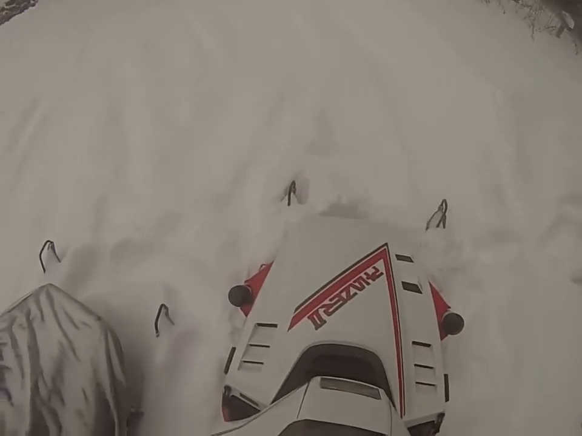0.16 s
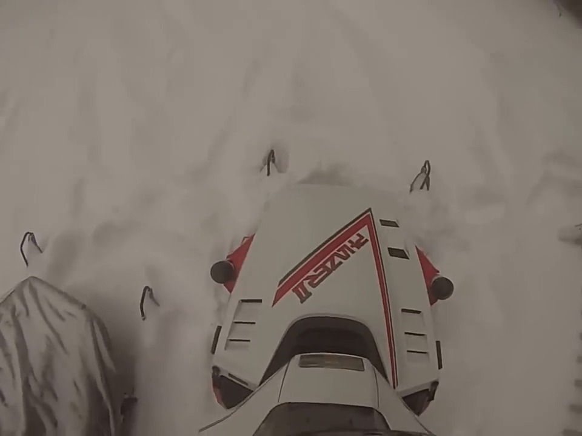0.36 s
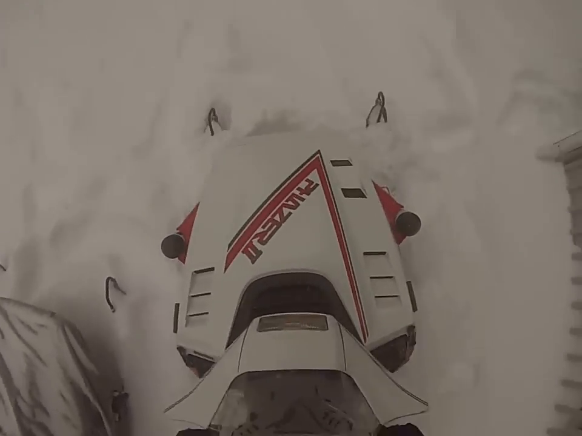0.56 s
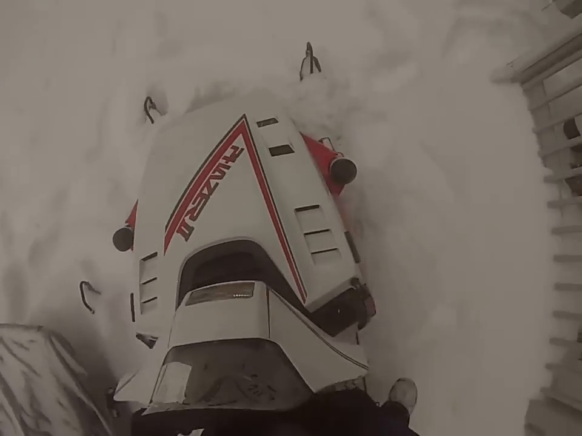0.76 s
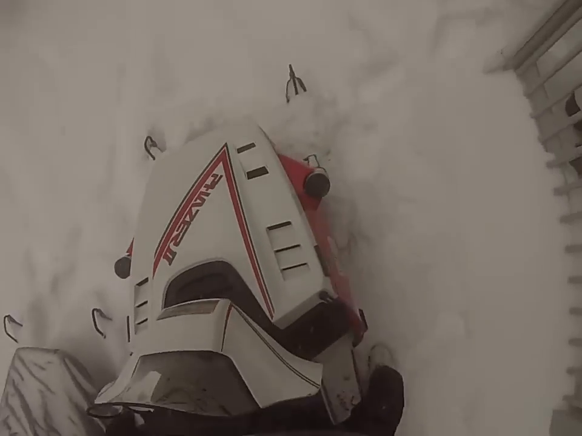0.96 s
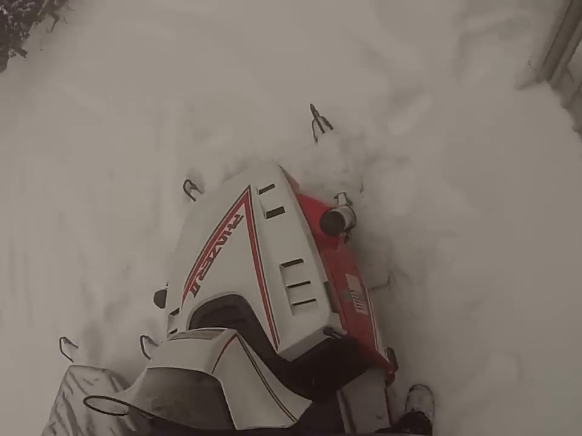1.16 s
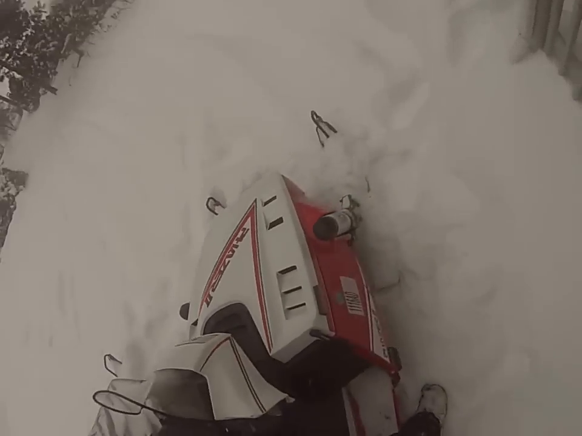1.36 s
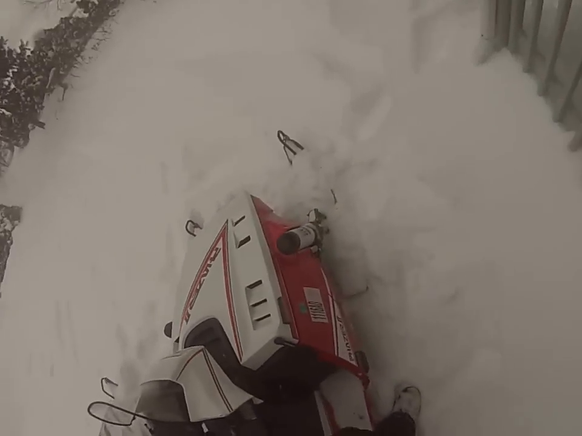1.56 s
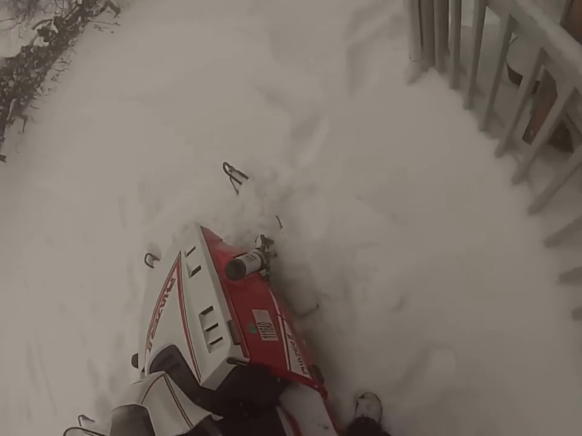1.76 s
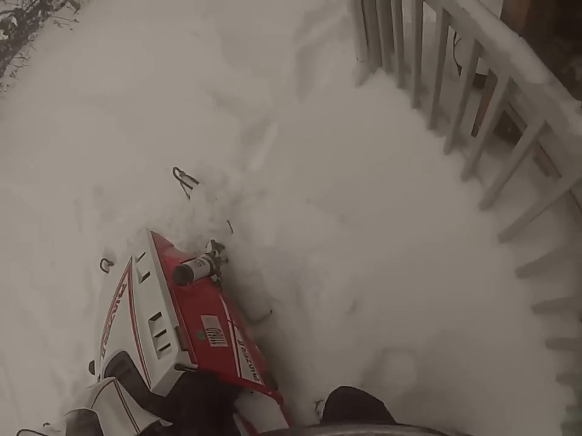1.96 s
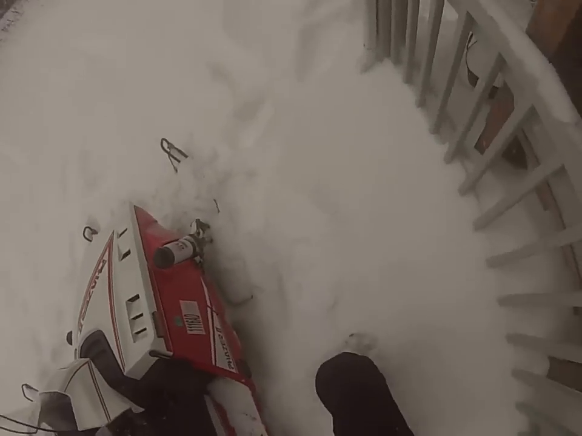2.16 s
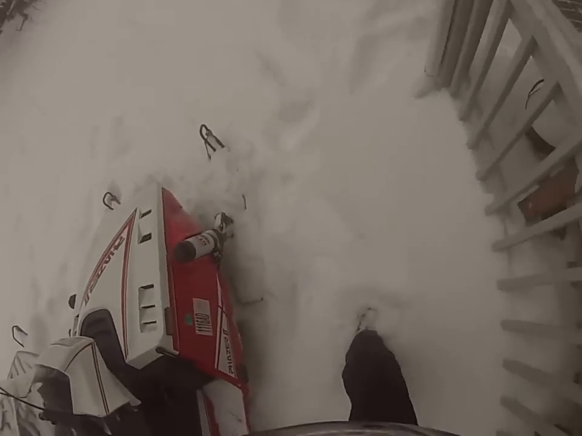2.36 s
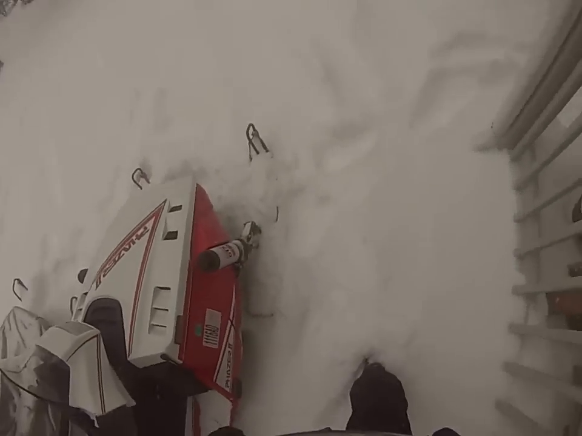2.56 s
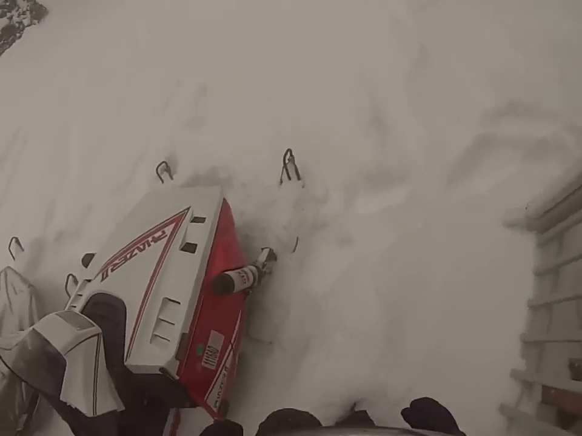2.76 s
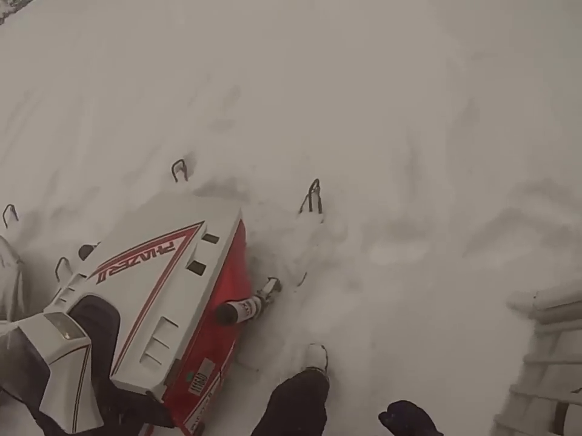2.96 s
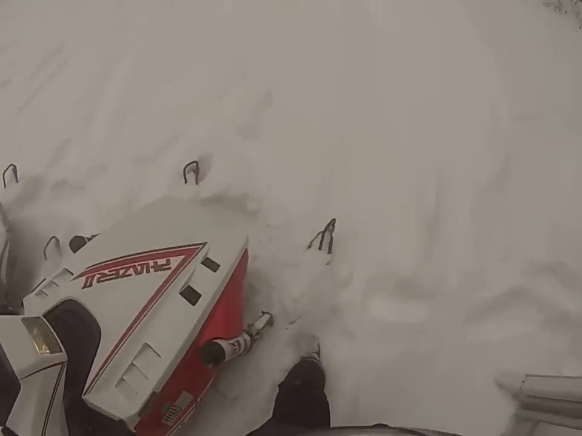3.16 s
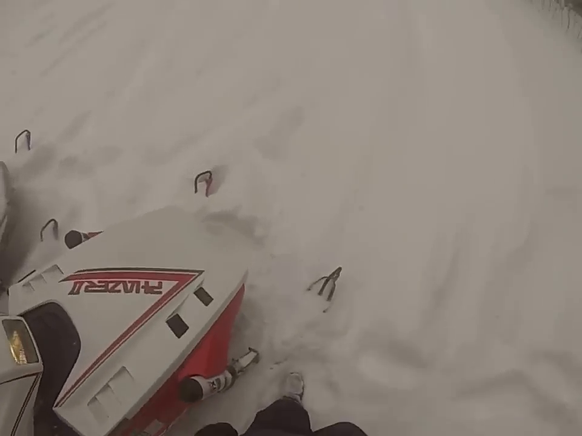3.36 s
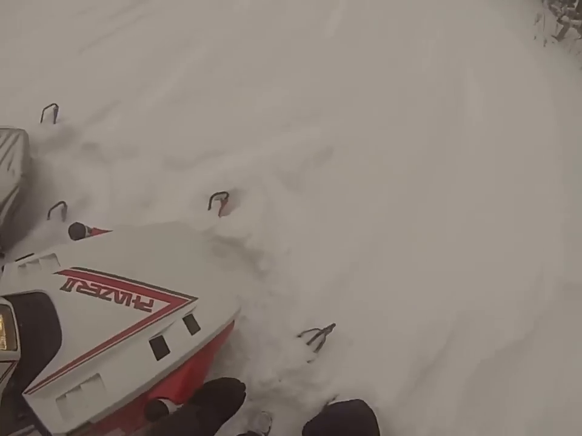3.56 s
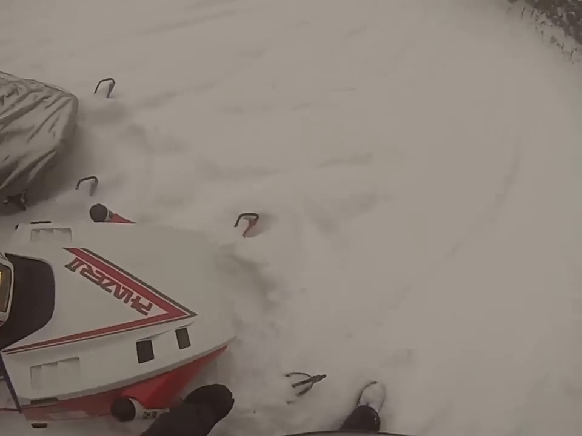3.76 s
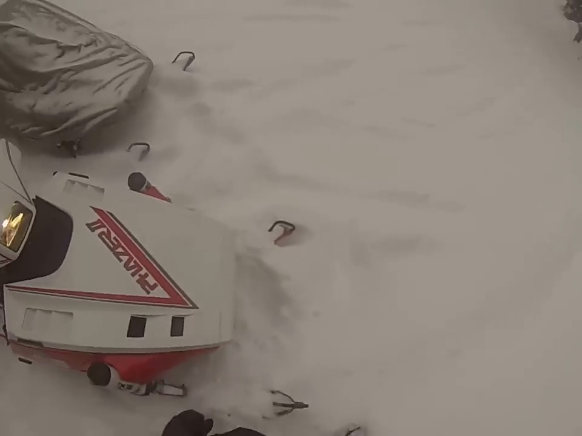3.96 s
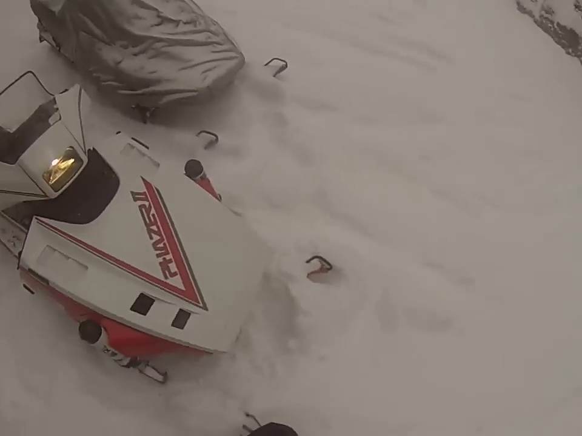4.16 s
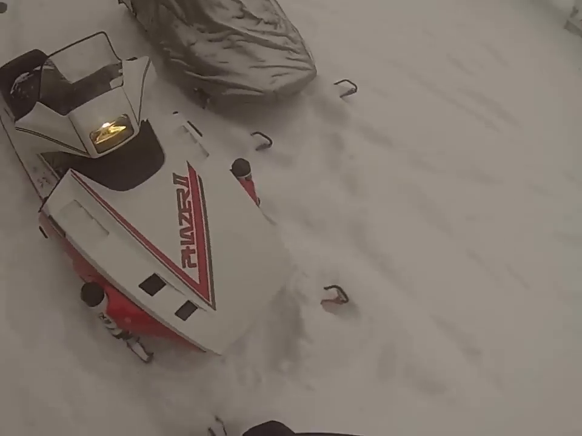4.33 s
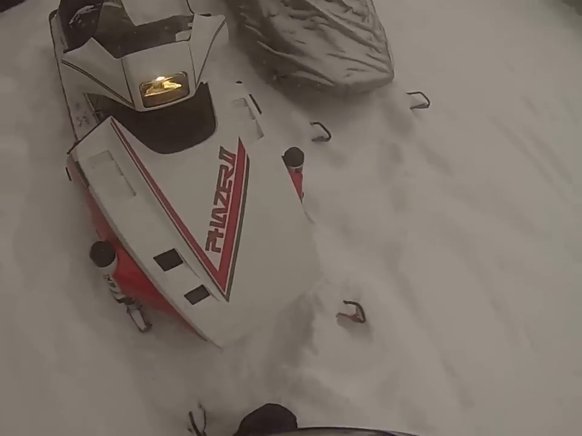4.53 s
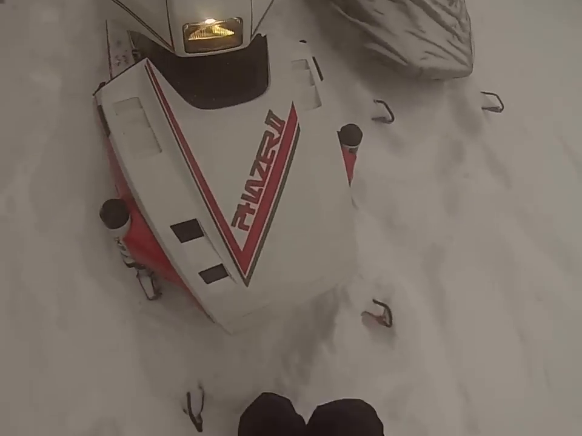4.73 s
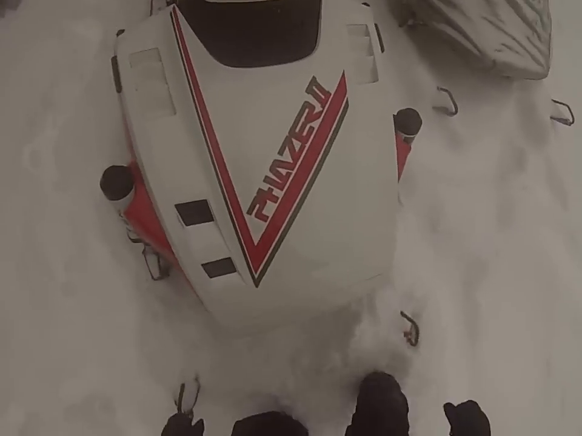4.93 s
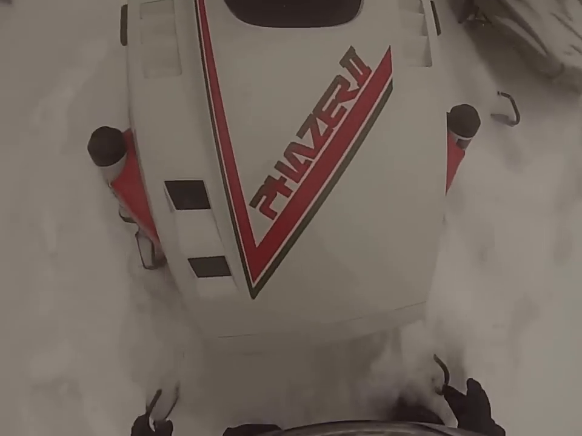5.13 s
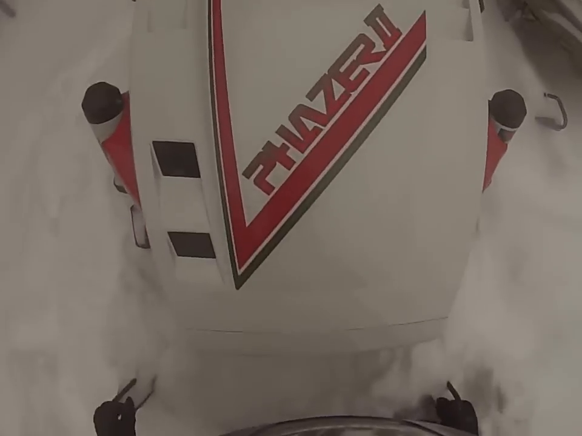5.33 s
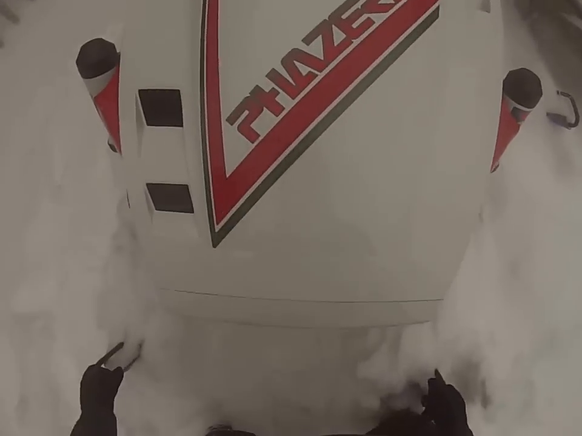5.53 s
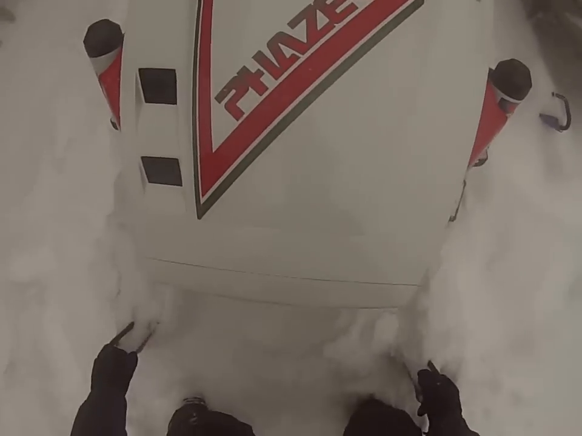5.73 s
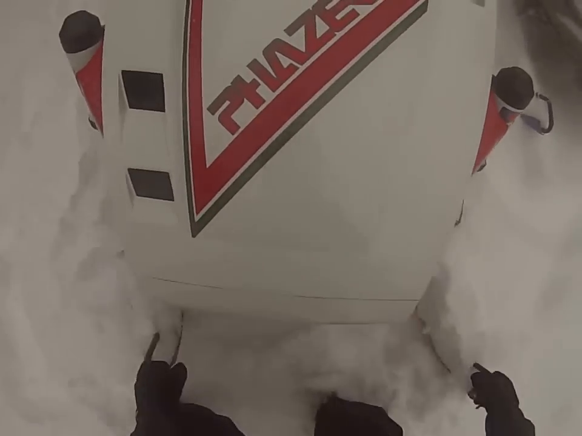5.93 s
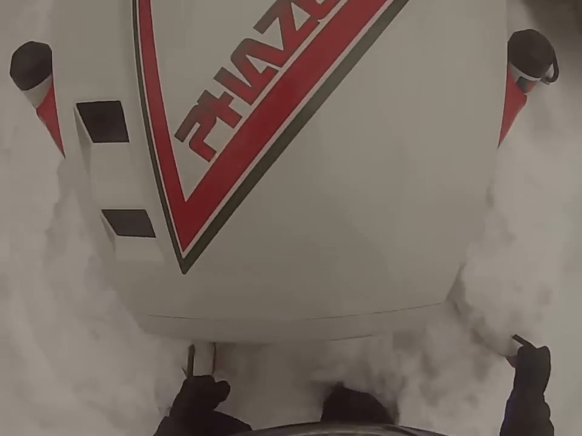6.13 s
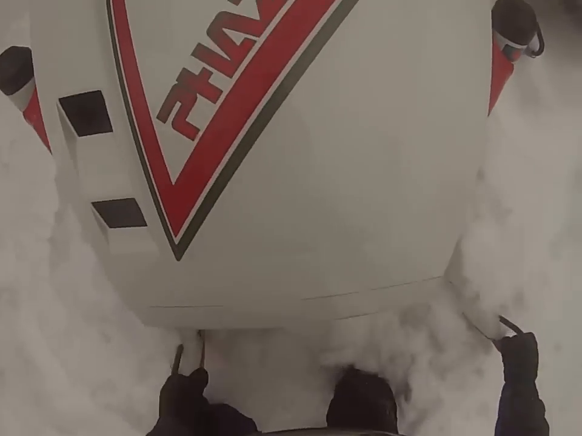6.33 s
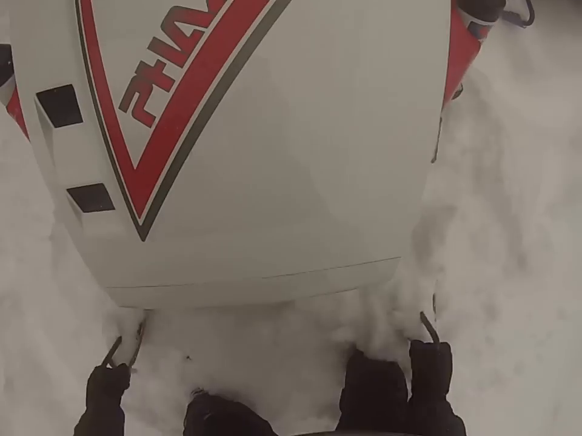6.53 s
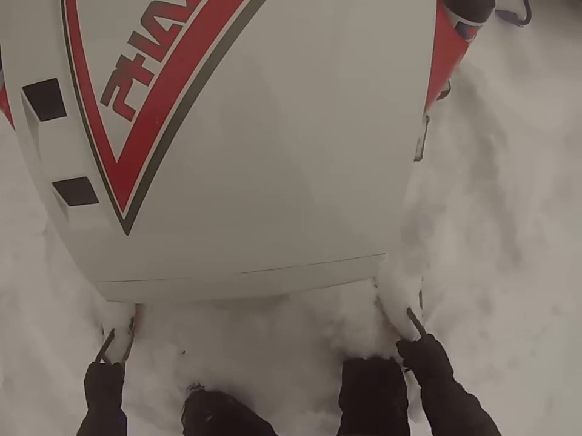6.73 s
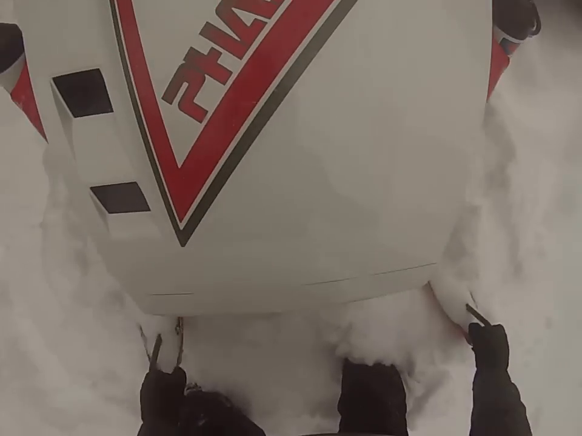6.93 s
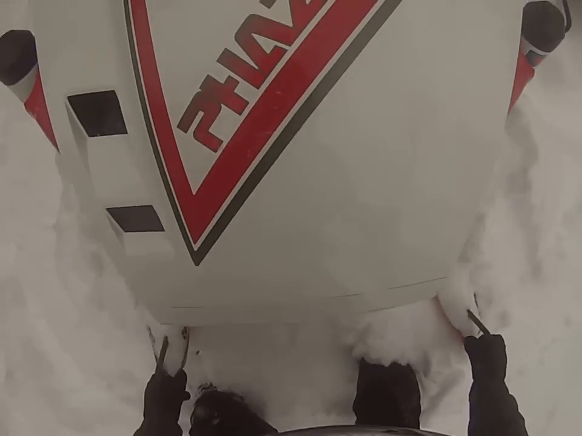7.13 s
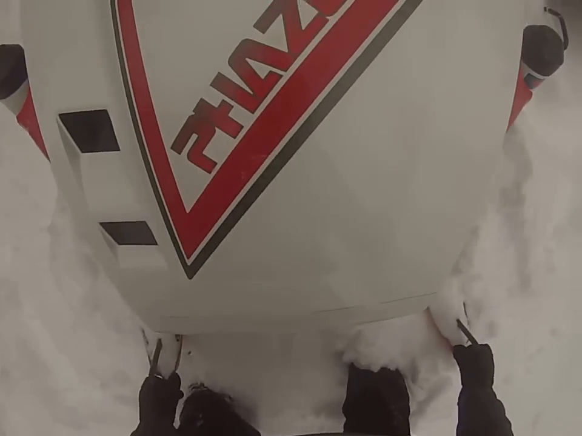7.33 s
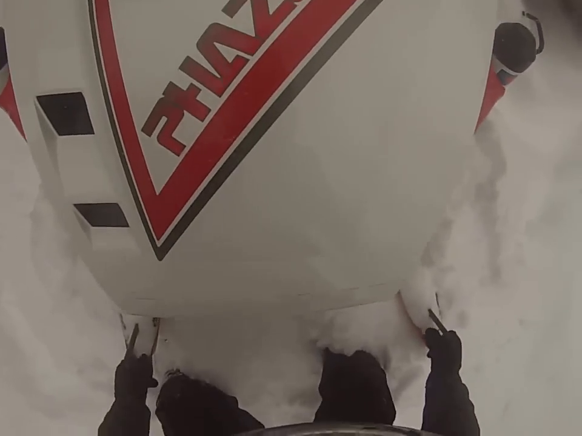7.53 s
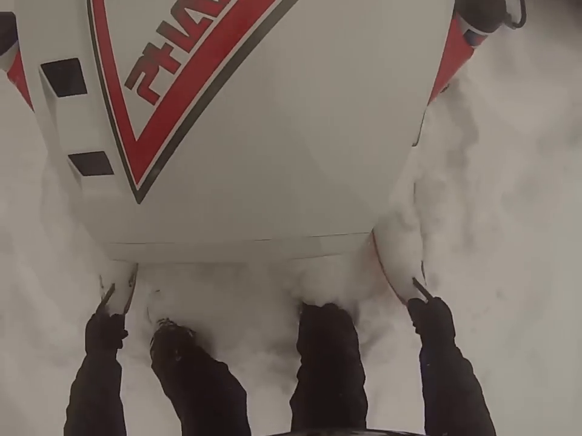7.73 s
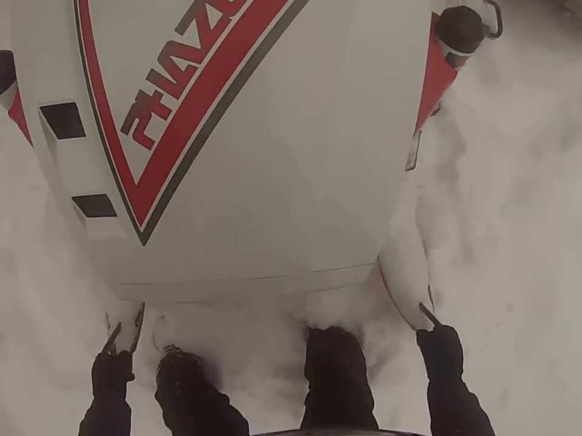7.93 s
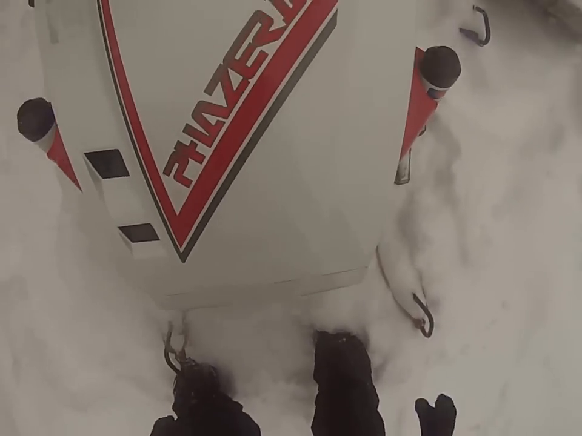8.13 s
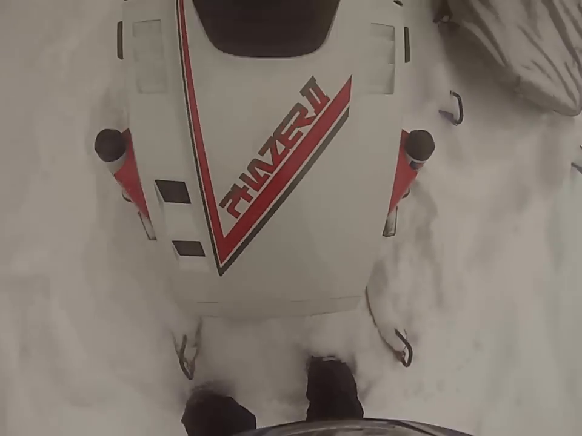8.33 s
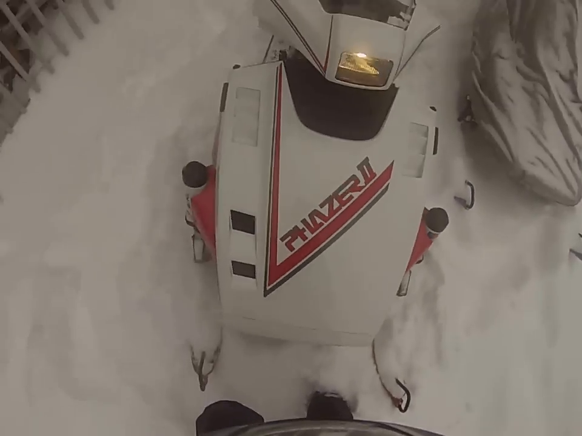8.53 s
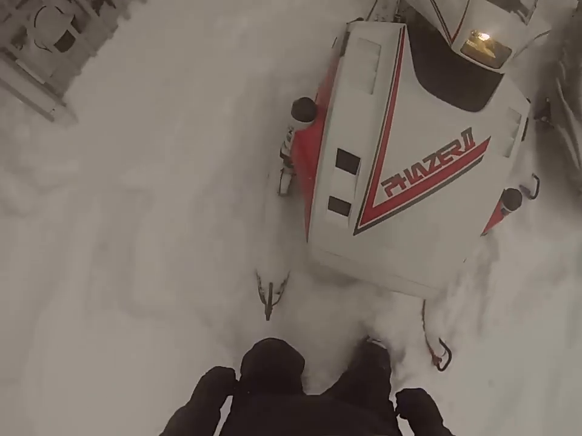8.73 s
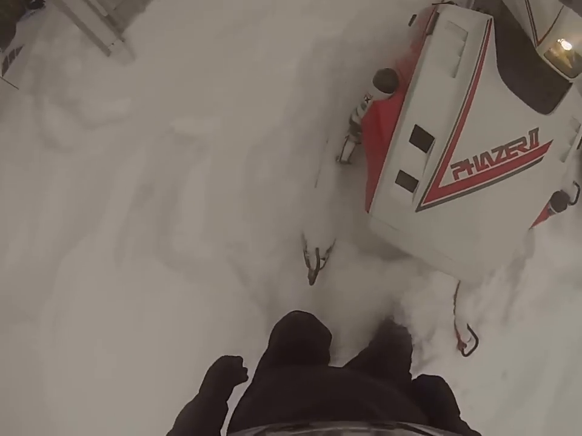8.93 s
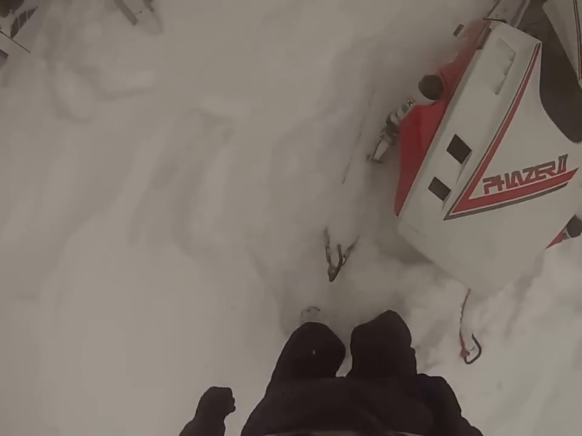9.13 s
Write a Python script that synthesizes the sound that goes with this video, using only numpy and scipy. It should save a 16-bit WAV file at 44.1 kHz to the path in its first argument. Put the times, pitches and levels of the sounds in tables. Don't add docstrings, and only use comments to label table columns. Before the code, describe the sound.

A two-stroke snowmobile engine idles throughout, heard outdoors in snow from a moving helmet microphone. A low hum near a hundred hertz throbs with a quick, uneven limp over rough exhaust burble, while the cowl clatters and hisses. From 0 to 3.4 seconds, crisp snow and cloth snaps, fine crackle and dull housing taps are frequent; the fan whine swells near 1 second and again at 2.5. From about 2 to 5 seconds an airy intake rush is present, and the engine seems a little farther off. At 5.2 the whine peaks as the sound grows close and bright. From 5.7 to 7.2 hard piston knocks cluster, ringing the panels, and the idle sags slightly. Scattered knocks continue to 8.3, with buzzing panels and a few snaps, before the clatter eases toward 9.3. Very low wind bumps and momentary treble thinning occur along the way.

```python
import sys
import numpy as np
from scipy import signal
from scipy.fft import rfft, irfft, next_fast_len
from scipy.io import wavfile
from scipy.ndimage import uniform_filter1d, map_coordinates

SR = 44100
rng = np.random.default_rng(int(sys.argv[2]) if len(sys.argv) > 2 else 0)


def store_wav(level_fs):
    pcm = np.round(np.clip(np.atleast_2d(level_fs), -1, 1) * 32767)
    wavfile.write(sys.argv[1], SR, pcm.T.astype(np.int16))


def boost_factor(decibels):
    exponent = np.asarray(decibels, float) / 20
    return 10 ** exponent


N = 409675


def rms_one(x):
    return x / np.sqrt(np.mean(x ** 2) + 1e-20)


def in_time(rows):
    s, *columns = np.transpose(rows)
    return [np.interp(np.arange(N) / SR, s, c) for c in columns]


def drift(rate):
    r = np.exp(-80 * np.pi * rate / SR)
    slow = signal.lfilter([1], [1, -2 * r, r * r], rng.standard_normal(N // 40 + 2002))[2000:]
    return np.interp(np.arange(N) / 40, np.arange(len(slow)), rms_one(slow))


def swells(rows):
    t = np.arange(0, N + 100, 100) / SR
    lift = np.max([db * np.exp(-2 * ((t - s) / length) ** 2) for s, length, db in rows], axis=0)
    return np.interp(np.arange(N) / SR, t, lift)


def coloured(x, spectrum):
    size = next_fast_len(N)
    hz, db = np.transpose(spectrum)
    bins = np.arange(size // 2 + 1) * SR / size
    gain = boost_factor(np.interp(np.log(bins + 1), np.log(hz), db, left=-90, right=-90))
    return rms_one(irfft(rfft(x, size) * gain, size)[:N])


def resonance(x, hz, width):
    r = np.exp(-np.pi * width / SR)
    return signal.lfilter([(1 - r * r) / 2, 0, (r * r - 1) / 2], [1, -2 * r * np.cos(2 * np.pi * hz / SR), r * r], x)


def ringing(x, hz, width):
    return rms_one(resonance(resonance(x, hz, width), hz, width))


def between(nose, side_sound, nose_sound):
    return (1 - nose) * side_sound + nose * nose_sound


# frequency in Hz, level in dB per Hz.
AIR_COLOUR = [(200, -17), (5000, -10), (9000, -10), (13000, -4), (15500, -28), (16500, -30)]


def still_air():
    return boost_factor(-65) * coloured(rng.standard_normal(N), AIR_COLOUR)


# centre in seconds, length in seconds, rise over the lull in dB.
GUSTS = [(.45, .3, 3), (1.15, .3, 11), (1.6, 0.32, 15), (2.1, 0.27, 22), (2.5, .15, 16), (3.2, 0.12, 17),
         (4.15, .3, 3), (4.55, 0.14, 11), (5.6, .25, 13), (6.03, 0.1, 14), (6.5, .15, 15), (6.85, 0.2, 10),
         (7.95, 0.48, 14)]


def buffet():
    slow_lumps = ringing(rng.standard_normal(N), 7.6, 20.0)
    quick_lumps = ringing(rng.standard_normal(N), 22, 28.3)
    lull_db = -52
    return boost_factor(lull_db + swells(GUSTS)) * rms_one(slow_lumps + .12 * quick_lumps)


def crackle(stir):
    grains_per_s = 420 * stir * boost_factor(3.0 * drift(11))
    sizes = boost_factor(2.1 * np.minimum(rng.exponential(1, N), 4))
    grains = (rng.random(N) < grains_per_s / SR) * sizes
    tails = signal.lfilter([1], [1, -.97], grains) * rng.standard_normal(N)
    band = signal.butter(1, [6000, 14000], "band", fs=SR, output="sos")
    return boost_factor(-58.5) * 2.36 * signal.sosfilt(band, tails)


# start in seconds, peak in dB.
SNAPS = [(0.0348, -37), (0.0772, -33), (0.1206, -31), (0.161, -28.5), (0.2379, -36), (0.3835, -44),
         (0.4032, -29), (0.4264, -34), (0.632, -37), (0.6444, -36), (0.7023, -33), (0.7991, -38),
         (0.8101, -36), (0.836, -29), (0.843, -33), (0.8739, -32), (1.0311, -35), (1.1, -39), (1.1313, -37),
         (1.1434, -34), (1.259, -38), (1.448, -35), (1.5075, -43), (1.5349, -35), (1.6057, -43),
         (1.62, -36), (1.8392, -37.5), (1.9849, -44), (2.0457, -41), (2.0916, -34), (2.1016, -34),
         (2.1221, -39), (2.173, -32.5), (2.3176, -37), (2.327, -39), (2.3411, -38), (2.3544, -37),
         (2.4099, -45), (2.4773, -43), (2.6599, -46), (2.7038, -38), (2.7516, -35), (2.794, -41),
         (2.9392, -36), (3.1487, -40), (3.161, -35), (3.316, -34), (3.3358, -37), (3.9539, -38),
         (4.148, -40), (5.4555, -34), (6.3126, -36), (7.2669, -34), (7.4689, -34), (7.4774, -32),
         (7.8506, -39), (8.2282, -35), (8.4881, -43), (8.6522, -41)]
# start in seconds, peak in dB.
TAPS = [(0.0972, -34), (0.403, -30), (0.5086, -29), (0.7991, -30), (0.8744, -38), (0.8914, -30),
        (1.4292, -34), (1.5449, -32), (2.0562, -39), (2.102, -31), (2.1755, -34), (2.2518, -35),
        (2.3184, -30), (2.3264, -34), (2.3404, -26), (2.661, -34), (3.2525, -34), (3.365, -27),
        (4.6548, -31), (5.3802, -37), (5.4335, -29), (5.8192, -41), (7.1716, -29), (7.2674, -38),
        (7.8012, -38), (8.6532, -34)]


def ticks(stir):
    snaps, rings, t = np.zeros(N + 400), np.zeros(N + 400), np.arange(400) / SR
    chance = np.cumsum(stir ** 2) / np.sum(stir ** 2)
    when = np.interp(rng.random(12), chance, np.arange(N) / SR)
    small = np.c_[when, -47 + 2 * rng.standard_normal((12, 2))]
    # (s, snap dB, ring dB)
    rows = [(s, db, db - 7) for s, db in SNAPS] + [(s, db - 16, db) for s, db in TAPS] + list(small)
    for (s, snap_db, ring_db), burst in zip(rows, rng.standard_normal((len(rows), 400))):
        start = round(s * SR)
        snap = burst * (np.exp(-t / 0.0006) + .2 * np.exp(-t / .003)) * (t > .0005)
        snaps[start:][:400] += boost_factor(snap_db + 8.0) * snap / np.abs(snap).max()
        ring_hz = 5150 * (1 + .04 * burst[-1])
        ring = np.sin(2 * np.pi * ring_hz * t) * 3 * np.exp(-t / 0.00059) * np.clip(t / 0.0012, 0, 1)
        rings[start:][:400] += boost_factor(ring_db + 2.5) * ring
    band = signal.butter(1, [5500, 16000], "band", fs=SR, output="sos")
    return (signal.sosfilt(band, snaps + 1e-18) + rings)[:N]


# time in seconds, pitch in Hz.
FAN_PITCH = [(0, 2100), (.5, 2078), (.85, 2065), (1.3, 2072), (2.2, 2085), (2.5, 2068), (3.1, 2088),
             (3.6, 2060), (4.6, 2090), (5.25, 2072), (5.9, 2068), (6.3, 2040), (7.15, 2015), (7.6, 2040),
             (8.5, 2025), (9.29, 2060)]
# time in seconds, level in dB.
FAN_LEVEL = [(0, -52), (.6, -41.5), (1.0, -37.5), (1.3, -47), (1.7, -46.5), (2.25, -50), (2.5, -39),
             (2.8, -60), (3.2, -48), (4.2, -55), (4.7, -44), (5.1, -35.5), (5.25, -30.5), (5.45, -37),
             (5.7, -38), (6.2, -50), (7.05, -41), (7.3, -43), (7.6, -41), (8.0, -54), (8.6, -43.5),
             (9.29, -49)]


def fan():
    (whine_hz,), (db,) = in_time(FAN_PITCH), in_time(FAN_LEVEL)
    wobble = 1.1 * drift(19) + drift(1.0)
    skirt = 1 + .15 * (drift(35) + 1j * drift(27))
    whine = np.exp(1j * (2 * np.pi * np.cumsum(whine_hz) / SR + wobble))
    return boost_factor(db + 1.3 * drift(5)) * np.real(skirt * whine)


# start in seconds, peak in dB.
KNOCKS = [(.238, -35), (.313, -24), (1.132, -26), (1.43, -29), (2.043, -29), (2.174, -21.5), (2.361, -26),
          (3.754, -28), (3.973, -20.5), (5.026, -19), (5.176, -22), (5.759, -17), (5.876, -25),
          (5.9135, -16), (5.994, -14), (6.055, -17), (6.1925, -12), (6.2566, -17), (6.3734, -17),
          (6.383, -13), (6.4348, -19), (6.458, -16), (6.478, -18), (6.6378, -14), (6.718, -11.5),
          (6.837, -18), (6.955, -18), (7.1182, -14), (7.1795, -18), (7.277, -32), (7.3701, -28),
          (7.4424, -20), (7.476, -19), (7.53, -25), (7.7323, -30), (8.0226, -24), (8.1, -23), (8.2281, -21),
          (8.2891, -16)]


def knocks():
    blows, k = np.zeros(N), np.arange(900)
    rattle_s = .009
    for (s, db), burst in zip(KNOCKS, rng.standard_normal((len(KNOCKS), 900))):
        thud = np.sin(k * 0.24) * np.exp(-k / 12) * 1.04
        rattle = .2 * burst * np.exp(-k / (rattle_s * SR))
        blows[round(s * SR):][:900] += boost_factor(db + 11) * (thud + rattle)
    return resonance(blows + 1e-18, 1590, 74) + 0.71 * resonance(blows + 1e-18, 2150, 160)


def strokes(firings, depth_db, scatter_db):
    count = firings.astype(int)
    strength = uniform_filter1d(rng.standard_normal(count[-1] + 1)[count], size=120)
    return rng.standard_normal(N) * boost_factor(depth_db * np.cos(np.pi * firings) + scatter_db * strength)


def intake(rush):
    start, end, turn_s = 2.0, 5.1, 0.47
    hidden_db, open_db = -58.5, -55
    db, = in_time([(start - turn_s, hidden_db), (start, open_db), (end, open_db), (end + turn_s, hidden_db)])
    return boost_factor(db) * ringing(rush[::-1], 6850, 990)


# frequency in Hz, level in dB per Hz.
COWL_SIDE = [(760, -26), (1300, -14), (1430, -11), (1630, 0.5), (1860, -10), (2130, -8.5), (2380, -15.5),
             (2610, -11), (3270, -13.5), (3520, -14.5), (3900, -32), (4200, -48), (5460, -75.5),
             (9240, -120)]
COWL_NOSE = [(760, -24), (1300, -10), (1360, -46), (1410, -10.5), (1650, -4.5), (1860, -3.5), (2090, -2.5),
             (2450, -9), (2570, -8), (2850, -14), (3490, -8), (4200, -20.5), (5460, -62.5), (9240, -120)]
# frequency in Hz, level in dB per Hz.
HISS_SIDE = [(3600, 6), (4000, -3), (4500, 2.5), (5000, 3), (5300, 5.5), (5900, 0.5), (7300, -8.5),
             (8300, -9.5), (10000, -9), (12000, -31), (15400, -45), (16000, -40)]
HISS_NOSE = [(3600, -18), (4000, -5.5), (4500, 3.5), (5000, 4.5), (5300, 2), (5900, 7.5), (7300, -1.5),
             (8500, -6), (10200, -4.5), (11500, -10.5), (15400, -16), (16000, -40)]
# frequency in Hz, width in Hz, level in dB.
PANELS = [(1057, 84, -16), (1474, 163, -9.5), (2230, 180, -12.5), (2388, 58, -11.5), (3112, 73, -17.5),
          (3436, 190, -14.5), (4760, 110, -22), (5330, 360, -11.5)]
# frequency in Hz, width in Hz, level in dB.
BRACKETS = [(3460, 80, -10), (4800, 120, -18), (5300, 150, -17), (1640, 50, -10)]
# centre in seconds, length in seconds, rise over its rest in dB.
BUZZES = [(1.45, 0.14, 6), (2.35, 0.12, 16), (2.75, 0.34, 16), (3.3, 0.071, 9), (5.9, 0.23, 4),
          (6.28, .12, 3), (6.5, .2, 11), (7.1, 0.66, 7.5), (7.45, 0.29, 9), (8.15, 0.22, 16)]


def body(firings, nose, cowl_db, echo_ms):
    knock = strokes(firings, depth_db=1.0, scatter_db=1.0)
    rush = strokes(firings, depth_db=.6, scatter_db=1.74)
    cowl = between(nose, coloured(knock, COWL_SIDE), coloured(knock, COWL_NOSE))
    panels = sum(boost_factor(db + 2.0 * drift(0.89)) * ringing(knock, hz, width) for hz, width, db in PANELS)
    clatter = boost_factor(-41.5 + cowl_db) * (cowl + boost_factor(-6.5) * panels)

    big_panel_db = -59 + 0.85 * cowl_db + swells(BUZZES) + 4 * drift(7.1) + 1.5 * drift(5.5)
    big_panel = boost_factor(big_panel_db) * between(nose, ringing(knock, 1605, 110), ringing(knock, 1668, 199.8))

    hiss = between(nose, coloured(rush, HISS_SIDE), coloured(rush, HISS_NOSE))
    hiss = hiss + .25 * map_coordinates(hiss, [np.arange(N) - echo_ms * SR / 1000], order=3)
    brackets = sum(boost_factor(db + 2.5 * drift(2.5)) * ringing(rush, hz, width) for hz, width, db in BRACKETS)
    hiss_db = -49.5 + 0.63 * cowl_db
    return clatter + big_panel + boost_factor(hiss_db) * (hiss + brackets) + intake(rush)


# eighths of the firing rate, level in dB from the side, dB from the nose.
LIMP_LINES = [(2, -32, -46), (3, -40, -36), (4, -18, -24), (5, -25, -18), (7, -16.5, -23), (9, -15, -31),
              (10, -20, -32), (11, -31, -21), (12, -30, -19), (13, -24, -16.5), (14, -34, -32),
              (16, -19, -28), (18, -32, -38), (19, -23, -28), (20, -24, -29), (21, -27, -30),
              (24, -27, -27), (27, -42, -36), (28, -38, -24), (29, -42, -34), (32, -24, -34),
              (36, -32, -28), (37, -35, -30), (40, -36, -28)]
# frequency in Hz, level in dB per Hz.
BURBLE_SIDE = [(24, -50), (40, -29), (78, -4.5), (102, -3), (128, -8), (153, -13), (253, -14), (321, -26.5),
               (420, -21), (738, -27), (1400, -27), (1820, -67), (3080, -120)]
BURBLE_NOSE = [(24, -55), (40, -31), (76, -8), (102, -7.5), (122, -14), (146, -10.5), (212, -22),
               (540, -17), (728, -21.5), (883, -18.5), (1400, -27.5), (1820, -72), (3080, -120)]


def exhaust(firings, limp, nose, cowl_db, outlet_db):
    throb_db = np.clip(2.1 - 1.3 * nose, 1.2, 2.4) * np.cos(limp)
    hum_db = -29.5 + outlet_db + .5 * drift(4.0) + throb_db
    hum = np.sqrt(2) * boost_factor(hum_db) * np.sin(2 * np.pi * firings + 0.048 * drift(6))

    lines = np.zeros(N)
    for eighths, side_db, nose_db in LIMP_LINES:
        if abs(eighths - 8) <= 1:
            continue
        turn = 4 * round(eighths / 4)
        angle = np.pi / 4 * turn * firings + (eighths - turn) * limp
        angle = angle + 2 * np.pi * rng.random() + .3 * drift(2)
        db = side_db + nose * (nose_db - side_db) + .5 * np.sqrt(eighths) * drift(1.36)
        lines += boost_factor(db) * np.sin(angle)

    puffs = rng.standard_normal(N) * boost_factor(0.71 * drift(10.0))
    gas = between(nose, coloured(puffs, BURBLE_SIDE), coloured(puffs, BURBLE_NOSE))
    burble_db = -43.5 + 0.6 * cowl_db + .5 * drift(2.2)
    return hum + boost_factor(burble_db) * (boost_factor(10.5) * lines + boost_factor(-2.5) * gas)


# time in seconds, firing rate in Hz, rate of the limp in Hz.
SPEED = [(0, 103, 12.8), (.5, 101.9, 12.8), (.9, 101.2, 12.8), (1.3, 101.4, 13), (1.75, 101.75, 13),
         (2.75, 101.4, 13.6), (3.25, 101.7, 13.6), (3.75, 101.05, 13.6), (4.55, 102.35, 13),
         (5.5, 101.7, 13), (5.9, 101.2, 13.2), (6.22, 99.9, 15.8), (6.65, 99.5, 15.8), (7.15, 98.8, 15.5),
         (7.6, 99.55, 15.2), (8.4, 98.6, 15), (8.8, 99.5, 14), (9.29, 100.1, 13)]
# time in seconds, facing the nose from 0 to 1, nearness to the cowl in dB,
# nearness to the exhaust outlet in dB, delay of a close echo off the ground or helmet in ms.
WALK = [(0, 0.3, -0.5, 0, 0.23), (.95, 0.48, 1.5, 0, 0.29), (1.2, 0.34, 0.5, -1, 0.24),
        (1.45, 0.2, 0.5, -4, 0.25), (1.9, 0.26, -2, -3.5, 0.28), (2.7, 0.19, -2, -4, 0.26),
        (3.15, 0.18, -2, -4, 0.27), (3.5, 0.28, -1.5, -7.5, 0.26), (4.3, 0.44, -2.5, -5, 0.29),
        (4.7, 0.67, 1.5, -1.5, 0.16), (5.3, 0.75, 4.5, 2.5, 0.2), (5.9, 0.97, 5.5, 0, 0.27),
        (6.8, 0.94, 5, -2, 0.248), (7.5, 1, 6.5, -1, 0.26), (8.2, 0.8, 4.5, -4.5, 0.27),
        (8.6, 0.48, 0.5, -2.5, 0.24), (9.1, 0.6, -1, -3, 0.29), (9.29, 0.3, 1.5, -7, 0.29)]
# time in seconds, stir from 0 to 1.
STIR = [(0, 1), (3.4, 0.9), (3.75, 0.4), (4.3, .4), (4.6, .1), (5.9, 0.1), (6.3, .5), (7.1, .5), (7.3, 0.9),
        (8.3, 0.5), (9.29, 0.6)]


def scene():
    firings, limps = np.cumsum(in_time(SPEED), axis=1) / SR
    limp = 2 * np.pi * limps + .35 * drift(2.5)
    nose, cowl_db, outlet_db, echo_ms = in_time(WALK)
    nose, stir = np.clip(nose, 0, 1), np.clip(in_time(STIR)[0], .02, 1)
    surroundings = still_air() + buffet() + crackle(stir) + ticks(stir)
    engine = fan() + knocks() + body(firings, nose, cowl_db, echo_ms)
    engine = engine + exhaust(firings, limp, nose, cowl_db, outlet_db)
    return (surroundings + engine)[None]


# centre in seconds, top kept in Hz, share of the moment hit, # what is
# left of the weak lines in dB.
THINNED = [(1.492, 5200, .4, -14), (1.696, 7100, 1.2, -60), (1.79, 10000, .45, -12), (1.961, 5500, .4, -14),
           (3.136, 7200, .42, -16), (3.2, 7200, .4, -12), (3.626, 6000, .42, -14), (4.884, 5500, .4, -12),
           (5.544, 5500, .4, -12), (5.803, 6000, .3, -9), (5.993, 5800, .45, -13), (6.615, 5500, .5, -14),
           (6.975, 5000, .35, -12), (7.83, 3900, .45, -16), (8.51, 5500, .45, -15), (8.723, 5800, .4, -13),
           (9.236, 5500, .45, -14)]


def thin_moments(x):
    size = 1882
    out, window = x.copy(), np.sin(np.pi * np.arange(size) / size)
    hz = np.arange(size // 2 + 1) * SR / size
    for s, top_hz, share, left_db in THINNED:
        part = slice(round(s * SR) - size // 2, round(s * SR) + size // 2)
        fade = np.clip((window ** 2 - .9 + .6 * share) / .25, 0, 1)
        lines = rfft(x[part] * window)
        strong = np.abs(lines) > 1.9 * uniform_filter1d(np.abs(lines), size=24)
        strong = strong & (hz > 200) & (hz < top_hz)
        lost = ~strong * (hz > 200) * (hz < 14900) * (1 - boost_factor(left_db - 4))
        out[part] -= fade * irfft(lines * (lost - strong), size) / np.maximum(window, .5)
    return out


def top_cut(x):
    return signal.sosfilt(signal.butter(12, 16510, fs=SR, output="sos"), x)


def record(dry):
    low_pass = signal.ellip(10, .3, 62, 15330, fs=SR, output="sos")
    mix = thin_moments(signal.sosfilt(low_pass, dry[0]))[None]
    return top_cut(mix)


dry = scene()
out = record(dry)
store_wav(out)
```